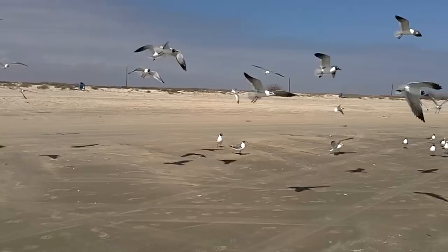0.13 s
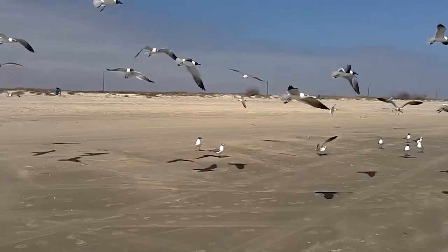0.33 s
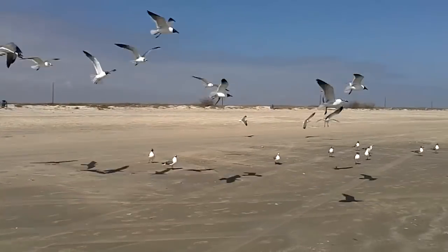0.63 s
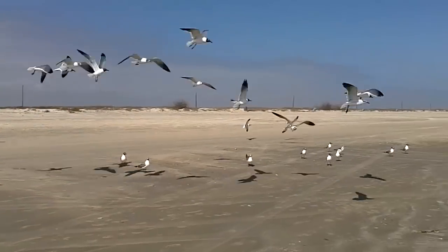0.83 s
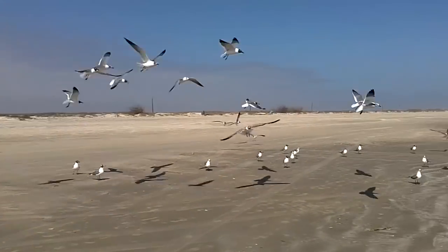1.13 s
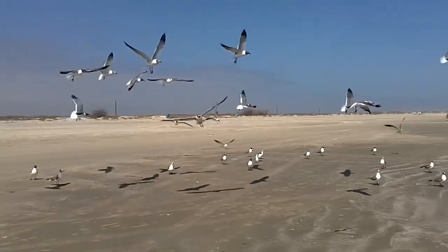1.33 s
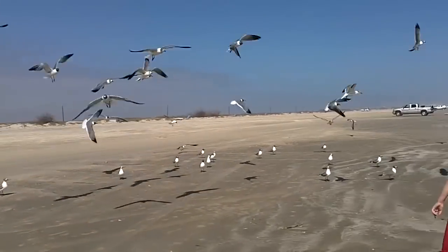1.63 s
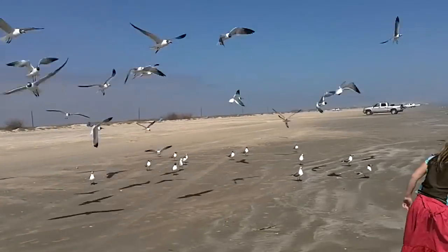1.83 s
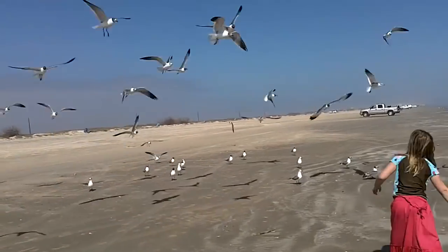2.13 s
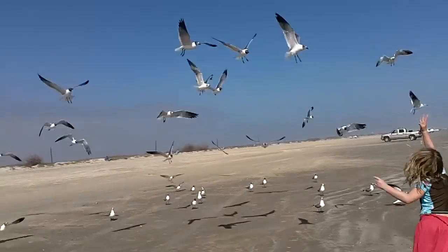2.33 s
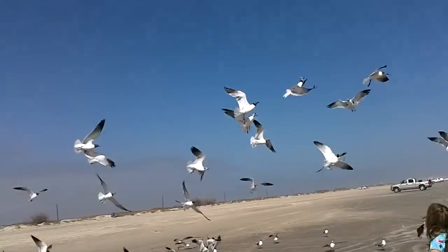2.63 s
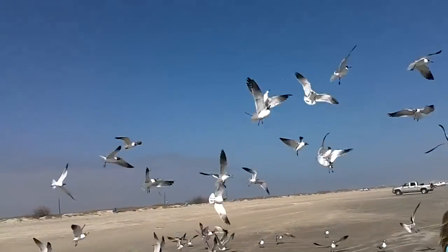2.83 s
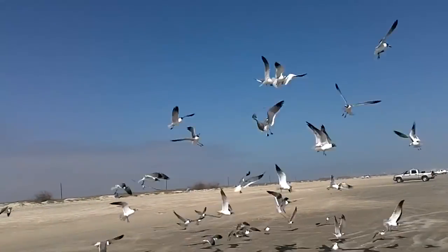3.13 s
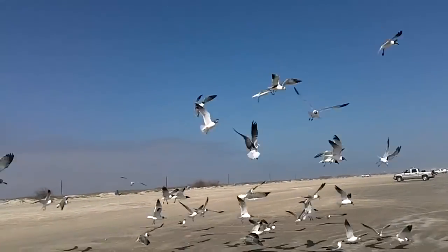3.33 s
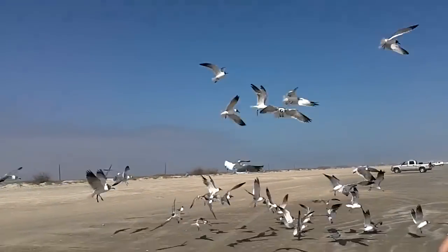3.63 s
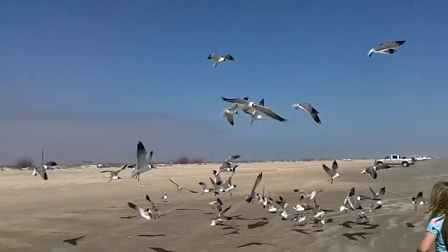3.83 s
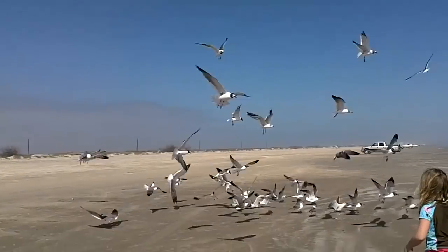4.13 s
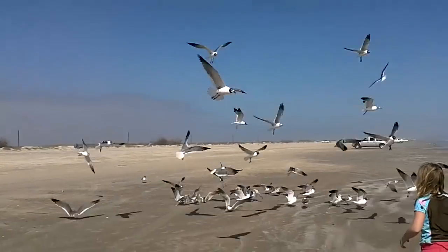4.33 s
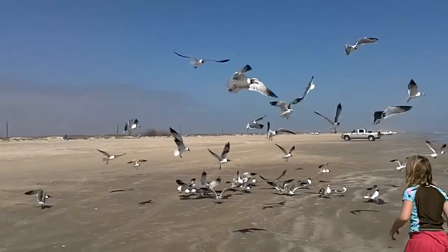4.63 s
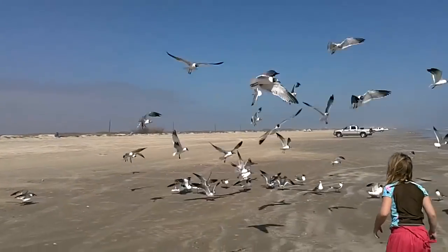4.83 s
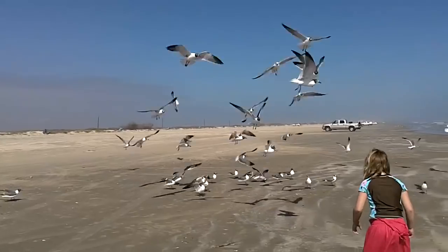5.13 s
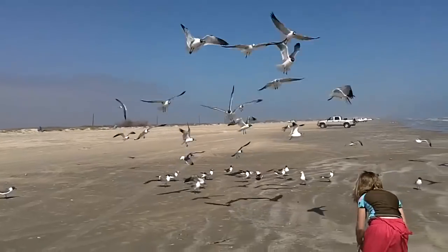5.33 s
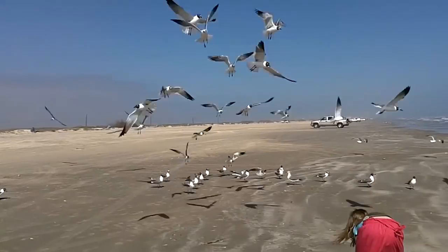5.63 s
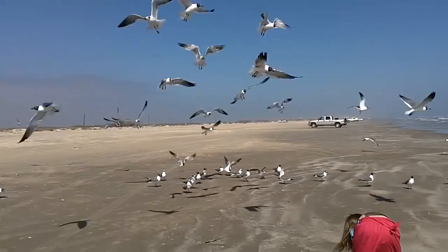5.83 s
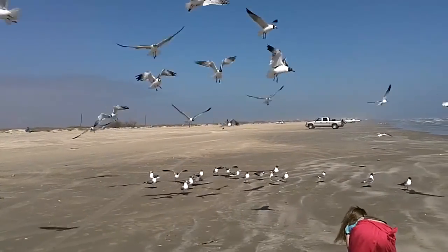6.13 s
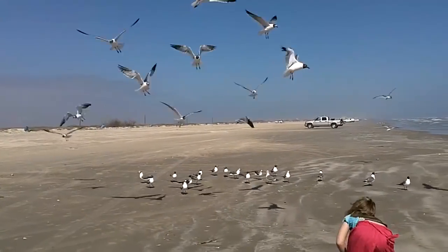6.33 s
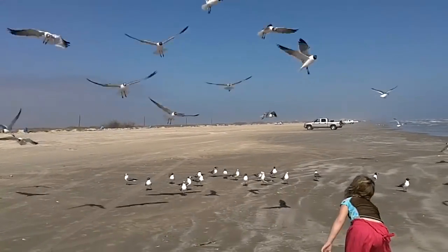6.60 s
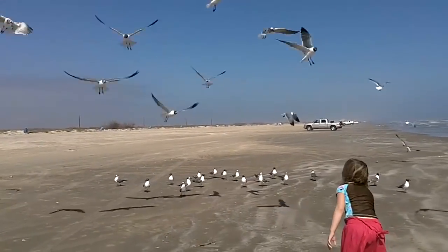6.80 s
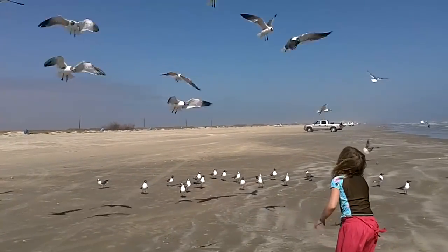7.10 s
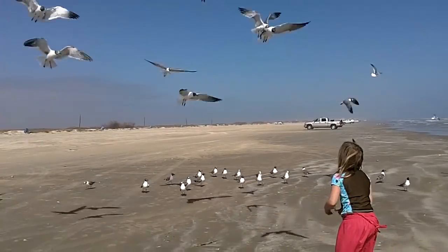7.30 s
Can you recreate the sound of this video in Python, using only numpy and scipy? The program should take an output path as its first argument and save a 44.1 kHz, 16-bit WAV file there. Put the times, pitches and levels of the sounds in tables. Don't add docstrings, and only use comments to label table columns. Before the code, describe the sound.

Laughing gulls squawk singly, then erupt into a dense overlapping squabble mid-way, over steady surf rush and low buffeting wind on an open beach.

```python
import sys
import numpy as np
from scipy import signal
from scipy.fft import rfft, irfft, next_fast_len
from scipy.io import wavfile
from scipy.ndimage import uniform_filter1d

SR = 44100
rng = np.random.default_rng(int(sys.argv[2]) if len(sys.argv) > 2 else 0)


def unload_wav(signal):
    wavfile.write(
        sys.argv[1],
        SR,
        np.round(np.clip(np.atleast_2d(signal).T, -1, 1) * 32767).astype(np.int16),
    )


def attenuation_scalar(level_db):
    decades = np.asarray(level_db, float) / 20
    return 10 ** decades


N = 328986


def evened(x):
    return x / np.sqrt(np.mean(x ** 2) + 1e-20)


def read_spectrum(points, hz):
    point_hz, value = np.transpose(points)
    return np.interp(np.log(hz + 1), np.log(point_hz + 1), value)


def add(mix, start_s, sound):
    part = mix[round(start_s * SR):][:len(sound)]
    part += sound[:len(part)]


def wobble(size, hz):
    span = max(int(SR / hz), 2)
    return evened(uniform_filter1d(uniform_filter1d(rng.standard_normal(size), span), span))


# frequency_hz, density_db (dB per Hz)
SURF_SPECTRUM = [(25, -16), (100, -2), (250, 1), (350, -2), (500, -6), (1000, -11.5), (1600, -15),
                 (2300, -17.5), (3200, -19.5), (4600, -20.5), (9000, -27), (15000, -18.5)]
# time_s, body_db, fizz_db
SURF_SWELL = [(0.0, -34, -3), (1.29, -34, -3), (1.7, -34.5, -0.5), (2.06, -34, -2), (2.97, -33.5, 1.5),
              (3.26, -35.5, 4), (3.78, -34, 1.5), (4.43, -33.5, 2), (4.71, -34.5, 0), (5.25, -33, -1),
              (7.46, -33.5, 0.5)]


def surf():
    frames, hop, size = N // 256 + 5, 256, 1024
    hz = np.fft.rfftfreq(size, 1 / SR)
    real, imag, patches = rng.standard_normal((frames, len(hz), 3)).T
    patches = uniform_filter1d(patches, 12, 0)
    patches = evened(uniform_filter1d(patches, 14, 1))

    time_s, body_db, fizz_db = np.transpose(SURF_SWELL)
    fizz = np.interp(np.arange(frames) * hop / SR, time_s, fizz_db)
    high = np.clip(np.log(hz / 1200 + 1e-9) / np.log(3), 0, 1)[:, None]
    level_db = read_spectrum(SURF_SPECTRUM, hz)[:, None] + 0.6 * patches + high * fizz
    bins = (real + 1j * imag) * attenuation_scalar(level_db)
    rush = evened(signal.istft(bins, nperseg=size, noverlap=size - hop)[1][:N])
    return rush * attenuation_scalar(2.5 + np.interp(np.arange(N) / SR, time_s, body_db))


# time_s, level_db
WIND_GUSTS = [(0.0, -34), (0.14, -25), (0.16, -28), (0.46, -26), (0.52, -39), (0.54, -25), (0.83, -26.5),
              (0.95, -38.5), (1.02, -27.5), (1.31, -40), (1.35, -26), (1.45, -38), (1.76, -35), (1.83, -31),
              (1.91, -41), (1.97, -30), (2.04, -34), (2.22, -29), (2.26, -44), (2.45, -34), (3.24, -34),
              (3.37, -43), (3.41, -29.5), (3.57, -45), (3.7, -33), (4.01, -41), (4.11, -33), (4.2, -44),
              (4.34, -31.5), (4.71, -40), (4.76, -37), (5.3, -34.5), (5.34, -40), (5.84, -40), (5.9, -45),
              (5.98, -38), (7.42, -40), (7.46, -35)]


def wind():
    hz = np.fft.rfftfreq(N, 1 / SR)
    rumble_floor = (hz / 22) ** 2 / (1 + (hz / 22) ** 2)
    knee = 1 / np.sqrt(1 + (hz / 45) ** 2)
    steep_fall = 1 / (1 + (hz / 150) ** 4)
    spectrum = rfft(rng.standard_normal(N)) * rumble_floor * knee * steep_fall
    low = evened(irfft(spectrum, N))
    time_s, level_db = np.transpose(WIND_GUSTS)
    return low * attenuation_scalar(-1.5 + np.interp(np.arange(N) / SR, time_s, level_db))


# centre_s, length_s, level_db
RUSTLES = [(0.592, .02, -68), (.91, .04, -65), (1.55, .02, -66), (2.196, .06, -60), (4.936, .02, -60),
           (5.423, 0.032, -55), (5.733, .003, -60), (5.783, .003, -63), (5.792, .003, -58),
           (5.804, .004, -53), (6.55, .02, -71)]


def rustles():
    out = np.zeros(N)
    size = 4000
    t = (np.arange(size) - size // 2) / SR
    for centre_s, length_s, level_db in RUSTLES:
        grains = wobble(size, 3000) * rng.standard_normal(size)
        envelope = np.exp(-(t / length_s * 2) ** 2)
        add(out, centre_s - size / 2 / SR, attenuation_scalar(level_db + 22) * grains * envelope)
    return signal.sosfilt(signal.butter(2, 6500, "high", fs=SR, output="sos"), out)


# start_s, end_s, half_line_db
PERIOD_DOUBLING = [
    (2.665, 2.78, 2),
]


def cry(contour, throat):
    low_hz, high_hz, high_db, width_hz, edge_db, hoarseness = throat
    time_s, *columns = np.transpose(contour)
    start_s, end_s = time_s[0], time_s[-1]
    t = np.arange(start_s, end_s, 1 / SR)
    pitch_hz, level_db = (uniform_filter1d(np.interp(t, time_s, c), 350, mode="nearest") for c in columns)
    jitter = 1 + 0.025 * hoarseness * wobble(len(t), 270)
    turns = np.cumsum(pitch_hz * jitter) / SR + rng.random()

    order = np.arange(2, 2 * int(15000 / pitch_hz.max()) + 1)[:, None] / 2
    whole = order % 1 == 0
    line_hz = order * pitch_hz

    def resonance(centre_hz):
        return 1 / (1 + (2 * (line_hz - centre_hz) / width_hz) ** 2) ** 2

    power = resonance(low_hz) + attenuation_scalar(2 * high_db) * resonance(high_hz) + attenuation_scalar(2 * edge_db)
    power = power / (1 + (1350 / line_hz) ** 6)

    half = 0
    for from_s, to_s, half_db in PERIOD_DOUBLING:
        if start_s < from_s and end_s > to_s:
            half = half + attenuation_scalar(half_db) * ((t > from_s) & (t < to_s))
    half = uniform_filter1d(half + np.zeros(len(t)), 400)
    half = half / (1 + (5000 / line_hz) ** 16)

    total = (power * whole * (line_hz < 7000)).sum(0)
    weight = np.sqrt(power / total) * np.where(whole, 1, half)
    spread = 0.9 * order ** 2
    phase = 2 * np.pi * (order * turns + rng.random()) + spread
    voice = np.sqrt(2) * (weight * np.cos(phase)).sum(0)

    rasp = np.sqrt(1 - np.clip(hoarseness, 0, 1) ** 2) + hoarseness * wobble(len(t), 900)
    fade = signal.windows.tukey(len(t), min(0.0049 / (end_s - start_s), 1))
    return start_s, voice * rasp * attenuation_scalar(level_db) * fade


# time_s, pitch_hz, level_db
CALL_CONTOURS = [
    [(1.14, 892, -53.5), (1.155, 998, -33), (1.165, 1094, -30.3), (1.2, 1095, -30), (1.25, 991, -37.7),
     (1.3, 886, -41), (1.36, 768, -47)],
    [(1.47, 1042, -47), (1.485, 1042, -39.3), (1.5, 1000, -51)],
    [(2.295, 864, -44), (2.32, 881, -37), (2.335, 952, -55)],
    [(2.328, 1050, -41.4), (2.336, 1087, -37), (2.4, 1082, -35.5), (2.43, 1015, -38), (2.46, 907, -42),
     (2.49, 788, -53.0)],
    [(2.48, 4726, -52.3), (2.5, 4554, -50), (2.54, 4762, -51.0), (2.6, 4235, -61.5)],
    [(2.615, 657, -36), (2.63, 745, -24), (2.642, 869, -31.3), (2.66, 764, -24.5), (2.69, 713, -26.5),
     (2.72, 729, -25.5), (2.75, 693, -28.5), (2.765, 660, -27), (2.79, 794, -36)],
    [(2.74, 772, -34), (2.76, 844, -30), (2.78, 860, -29.5), (2.8, 816, -28), (2.82, 737, -34.0)],
    [(2.785, 855, -36), (2.795, 938, -24.5), (2.85, 943, -28.7), (2.86, 893, -31), (2.89, 865, -31)],
    [(2.812, 928, -28.2), (2.825, 1008, -18), (2.845, 990, -25.5), (2.858, 868, -28)],
    [(2.87, 702, -35), (2.885, 762, -25.5), (2.92, 747, -36.4)],
    [(2.88, 779, -33), (2.92, 744, -32.5), (2.95, 606, -31)],
    [(2.93, 911, -46.9), (2.95, 824, -35), (2.97, 727, -32)],
    [(2.975, 945, -28), (2.99, 1069, -25.5), (3.0, 1087, -27.5), (3.04, 1048, -22), (3.1, 1093, -27.5),
     (3.16, 1107, -26.5), (3.2, 1094, -24.5), (3.23, 1060, -26), (3.26, 1050, -27), (3.3, 1075, -27),
     (3.35, 1065, -30.5), (3.39, 1035, -29)],
    [(3.085, 776, -30), (3.1, 932, -21.5), (3.11, 970, -17.5), (3.125, 965, -28), (3.14, 870, -30),
     (3.18, 818, -26.9), (3.21, 854, -23.9), (3.228, 854, -31)],
    [(3.222, 811, -37), (3.24, 810, -26.5), (3.27, 871, -39)],
    [(3.265, 717, -38.2), (3.31, 703, -30), (3.34, 553, -38)],
    [(3.325, 801, -41), (3.34, 758, -28), (3.36, 788, -27), (3.375, 780, -40)],
    [(3.36, 898, -36), (3.39, 878, -29.5), (3.41, 845, -41)],
    [(3.41, 685, -39), (3.44, 709, -28.5), (3.46, 670, -34)],
    [(3.39, 879, -23), (3.41, 812, -31), (3.44, 815, -37.6), (3.48, 749, -33)],
    [(3.628, 972, -33), (3.65, 1048, -28), (3.68, 973, -31), (3.7, 866, -45), (3.77, 776, -42.6)],
    [(3.716, 489, -39), (3.733, 541, -24), (3.75, 568, -25), (3.765, 535, -23), (3.785, 502, -33),
     (3.81, 510, -39)],
    [(3.825, 2935, -43), (3.865, 3283, -29.5), (3.885, 3142, -35), (3.91, 2935, -32), (3.97, 3084, -31),
     (3.998, 2882, -49)],
    [(3.865, 1274, -32), (3.89, 1323, -30), (3.915, 1356, -45)],
    [(3.9, 3338, -33), (3.95, 3433, -42), (4.0, 3565, -63.9)],
    [(4.02, 3750, -55), (4.05, 3990, -44), (4.1, 3861, -47.7)],
    [(4.055, 608, -42), (4.08, 714, -30), (4.105, 625, -33.5), (4.14, 678, -28.6), (4.165, 735, -30),
     (4.19, 675, -34), (4.21, 570, -34)],
    [(4.128, 864, -45), (4.158, 995, -23), (4.185, 857, -39)],
    [(4.156, 972, -28), (4.165, 1090, -19), (4.18, 1053, -23), (4.202, 980, -28)],
    [(4.203, 772, -26), (4.235, 849, -27), (4.255, 747, -32)],
    [(4.235, 838, -32), (4.252, 820, -30), (4.275, 735, -28)],
    [(4.2, 855, -46), (4.23, 855, -30), (4.26, 796, -32), (4.285, 857, -33)],
    [(4.278, 979, -28), (4.29, 983, -21), (4.305, 952, -29), (4.325, 1005, -27), (4.34, 965, -25),
     (4.35, 810, -40.6)],
    [(4.305, 703, -38), (4.32, 783, -31.9), (4.35, 806, -31), (4.36, 720, -33.5), (4.43, 764, -33.7)],
    [(4.36, 888, -42), (4.375, 985, -22), (4.395, 925, -25), (4.41, 853, -32), (4.44, 1010, -21),
     (4.449, 923, -30), (4.456, 919, -22), (4.48, 779, -40)],
    [(4.365, 887, -32), (4.42, 862, -34), (4.475, 837, -31)],
    [(4.47, 833, -36.9), (4.49, 840, -35), (4.505, 753, -40)],
    [(4.925, 1333, -45), (4.94, 1429, -34), (4.97, 1426, -39), (4.99, 1357, -41)],
    [(5.09, 1620, -42), (5.11, 1673, -34.5), (5.16, 1692, -37.5), (5.215, 1577, -42)],
    [(5.06, 4400, -47), (5.1, 4750, -39), (5.12, 4643, -52)],
    [(5.13, 4295, -51.4), (5.17, 4126, -47), (5.185, 3950, -52.8)],
]
# low_resonance_hz, high_resonance_hz, high_minus_low_db, width_hz,
# voice_edge_db (floor under the resonances), hoarseness (0-1)
THROATS = [(2370, 4300, 0, 270, -11, 0), (900.0, 5910.0, -13, 580.0, -22, 0.08),
           (2240, 4900, -3.1, 400.0, -26, 0.08), (2030, 4730, 2, 470, -15, 0.14),
           (3320.0, 5920.0, 10.0, 930.0, -32.4, 0.08), (2770, 5630, -10, 960, -26, 0.11),
           (2060.0, 4200, -1, 1500, -8, 0.14), (3840.0, 6310.0, -18, 2400, -14, 0.1),
           (2360.0, 5000, 2.5, 1600, -19.8, 0.16), (4140, 5800, -5.7, 260, -25.0, 0.04),
           (1920, 4600, -5, 1200, -14.4, 0.41), (2440, 4890.0, -8, 870, -24, 0.2),
           (2920.0, 5500, -5.5, 2100, -29, 0.17), (900.0, 3440, 15, 6000, -3, 0.22),
           (900.0, 5300, -2, 2300, -16, 0.66), (1770, 3850, -4, 510, -27.5, 0),
           (2600, 5270, -1, 370, -25, 0), (910, 2500, -16, 2000, -16, 0.54),
           (2470, 5600, -8, 2000, -23, 0.36), (2100, 4900, -15, 940, -18, 0.15),
           (1930.0, 5800, 4.5, 1700, -18.5, 0.2), (4400, 5680, 8, 1100, -14, 0.08),
           (3570, 6430, 11, 1300, -30.5, 0.15), (6100, 3540, -4, 1800, -26.0, 0.1),
           (4630.0, 4800, 10.6, 1190.0, -26.8, 0.1), (3260.0, 4660.0, 8.0, 920.0, -26.8, 0.2),
           (2100, 3740, 2, 980, -13.5, 0.14), (3240, 5200, -3, 400.0, -30, 0.4),
           (3950, 5770, -3, 350, -32, 0), (4500, 6040, -8, 400.0, -23, 0),
           (2310.0, 4800, -2.2, 1350.0, -15.2, 0.4), (1330.0, 4540.0, -0.4, 1310.0, -19, 0.15),
           (2280, 5440, 3.5, 780, -11, 0.1), (1600.0, 3750, -12, 1250, -22, 0),
           (2120, 3870, 0.5, 1800, -15, 0), (970, 5800, -13, 2900, -23, 0.47),
           (1830.0, 4920.0, -11.1, 1030.0, -27, 0.7), (3770, 5700, -18, 370, -24.6, 0.1),
           (3810, 5740, -2, 400.0, -43, 0.21), (1990.0, 4500.0, 0.3, 900.0, -25.1, 0.02),
           (4160.0, 4160.0, -16.1, 400.0, -20.7, 0.1)]


def flock():
    birds = np.zeros(N)
    for contour, throat in zip(CALL_CONTOURS, THROATS):
        add(birds, *cry(contour, throat))
    size = 3000
    t = np.arange(size) / SR
    decay = attenuation_scalar(-60 * t / 0.088) * (t > 0.002)
    scatter = evened(rng.standard_normal(size) * decay) / np.sqrt(size)
    return birds + attenuation_scalar(-8.5) * signal.oaconvolve(birds, scatter)[:N]


def scene():
    return (flock() + surf() + wind() + rustles())[None]


# frequency_hz, gain_db
CAPSULE_RESPONSE = [(20, 0.5), (5000, 3), (6300, -3.5), (9000, -13.5), (12500, -28), (15000, -33)]
# centre_hz, width_hz
PORT_NULLS = [(2720, 1166), (5500, 1340), (7870, 2950), (10930, 1150)]


def microphone(dry):
    size = next_fast_len(N)
    hz = np.fft.rfftfreq(size, 1 / SR)
    response = attenuation_scalar(read_spectrum(CAPSULE_RESPONSE, hz))
    for centre_hz, width_hz in PORT_NULLS:
        offset = (hz - centre_hz) ** 2
        response = response * np.sqrt((offset + 40 ** 2) / (offset + (width_hz / 2) ** 2))
    return irfft(rfft(dry, size) * response, size)[:, :N]


def top_cut(x):
    return signal.sosfilt(signal.butter(12, 15250, fs=SR, output="sos"), x)


def record(dry):
    mix = microphone(dry)
    return top_cut(mix)


dry = scene()
out = record(dry)
unload_wav(out)
```